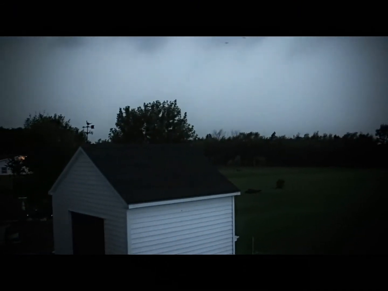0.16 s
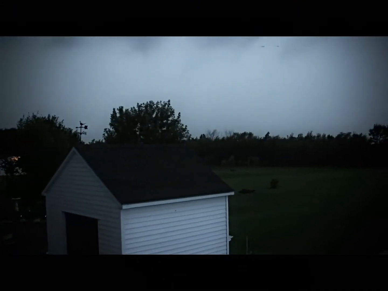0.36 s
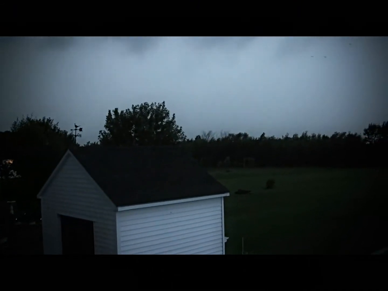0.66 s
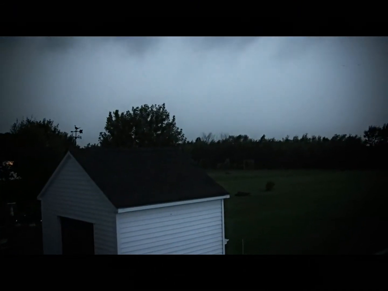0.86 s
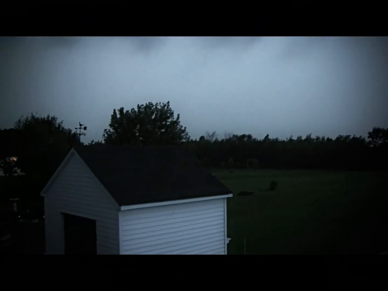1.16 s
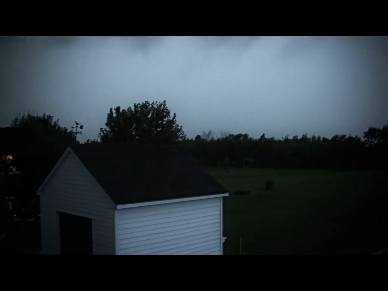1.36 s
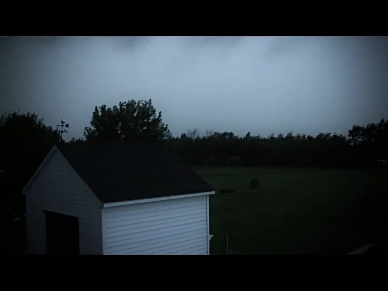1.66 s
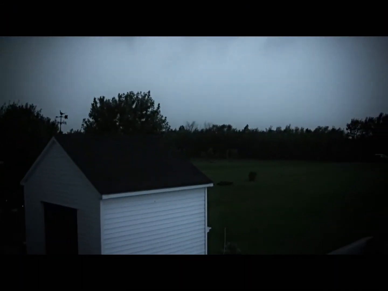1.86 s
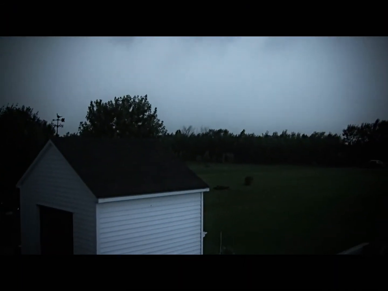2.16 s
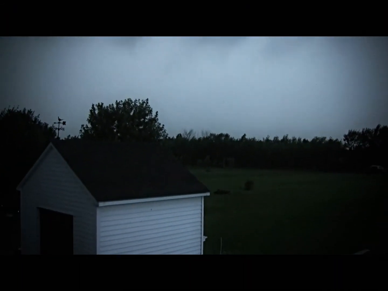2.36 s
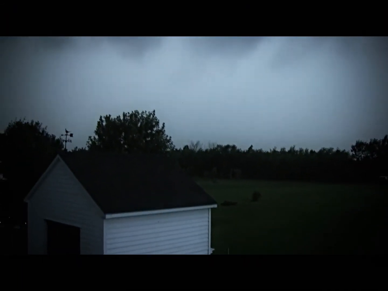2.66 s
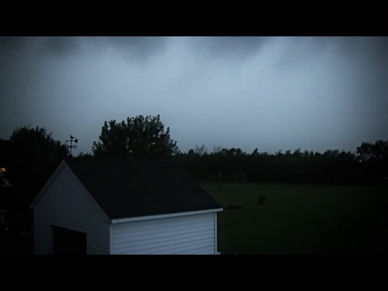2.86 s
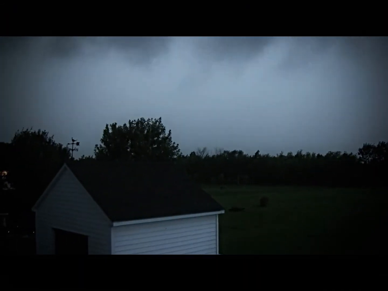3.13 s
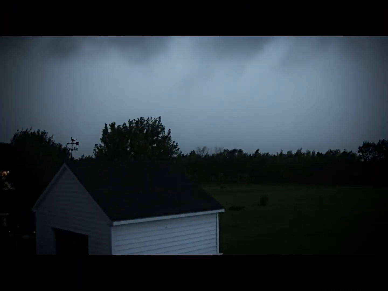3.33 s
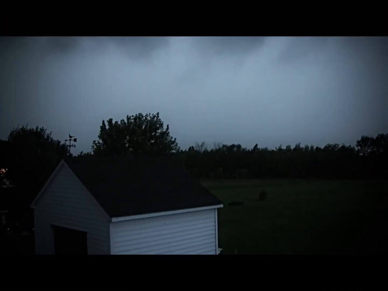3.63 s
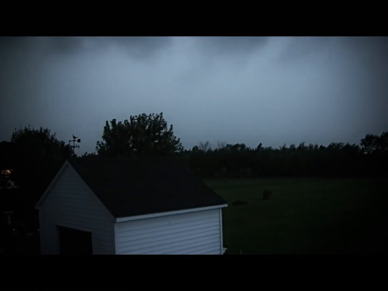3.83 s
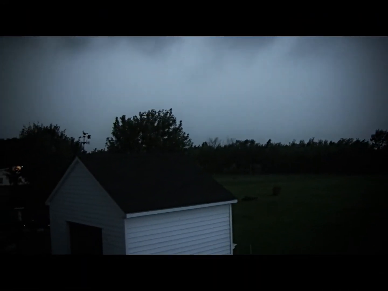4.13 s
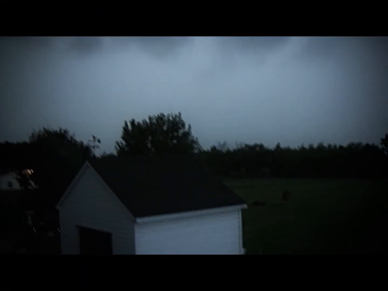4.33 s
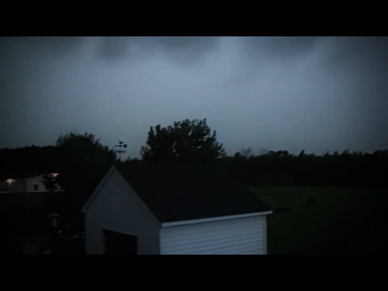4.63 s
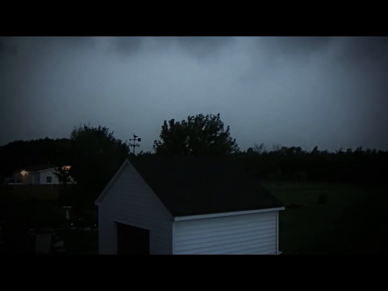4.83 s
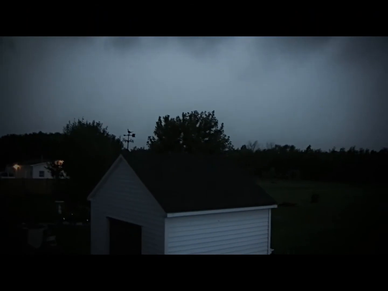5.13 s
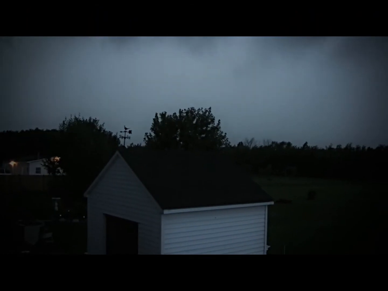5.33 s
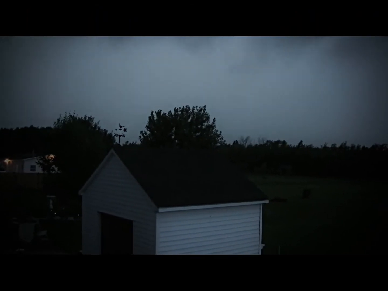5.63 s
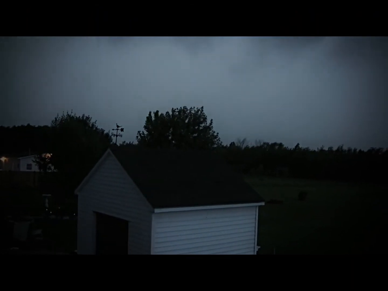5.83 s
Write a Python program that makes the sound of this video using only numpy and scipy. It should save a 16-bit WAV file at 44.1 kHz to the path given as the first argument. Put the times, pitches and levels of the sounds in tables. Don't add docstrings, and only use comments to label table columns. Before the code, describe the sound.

Thunder over a dark grassy yard: a third of a second of low haze, then a sudden heavy boom, sharp window-like snaps and rattling, and a second big boom around one and a half seconds. Further thuds merge into a long bass rumble that pulses and fades without fully stopping. Rain is only a faint far hiss. The stereo image is narrow in the bass, slightly boomy, with muffled highs and peaks held at full level.

```python
import sys
import numpy as np
from scipy import signal
from scipy.fft import rfft, irfft, next_fast_len
from scipy.io import wavfile
from scipy.ndimage import uniform_filter1d, minimum_filter1d

SR = 44100
rng = np.random.default_rng(int(sys.argv[2]) if len(sys.argv) > 2 else 0)


def log_audio(samples):
    frames = np.atleast_2d(samples).T
    limited = np.clip(frames, -1, 1)
    pcm = np.round(limited * 32767).astype(np.int16)
    wavfile.write(sys.argv[1], SR, pcm)


def field_ratio(decibels):
    return 10 ** (np.asarray(decibels, dtype=float) / 20)


N = 264319

# [t/s, level/dB, tilt towards short shocks/(dB per octave),
# clarity/(factor on the sharp fronts the air leaves)]
ROLL = [(0.0, -35.5, -1, 1.9), (0.308, -32, -0.6, 2.2), (0.328, -14, -3.5, 0.99), (0.58, -9.5, -2.85, 1.06),
        (1.129, -36, 11.5, 1.53), (1.249, -22.5, 3, 1.3), (1.575, -22, -3, 2.35), (1.605, -11.5, -1.3, 1.2),
        (2.05, -23.5, 1.5, 1.22), (2.09, -16.5, -4, 1.05), (2.47, -17.5, -0.7, 1.12),
        (2.78, -22.5, -1.0, 1.05), (3.0, -18, -4, 0.99), (3.39, -26.5, 1.1, 0.87), (4.17, -30, -1.7, 1.66),
        (4.31, -24.5, -3.5, 0.98), (5.2, -27, -3.5, 1.23), (5.99, -27, -2.2, 0.52)]
SHOCK_EDGES = [110, 190, 370]
# [f/Hz, share of the roll level/dB, build-up through echoes t/s]
SHOCK_LENGTHS = [(80.6, -10.5, .005), (145, -14, 0.0078), (265, -0.23, 0.0088), (473, -2.5, 0.013)]
# [t/s, peak level/dB, pitch f/Hz, t60/s]
SURGES = [(0.378, -11, 187, 0.81), (0.582, -2, 111, 0.11), (0.63, -11.3, 131, 1.3),
          (0.663, -11.5, 204, 1.68), (0.781, -9.5, 129, 0.91), (0.956, -12, 183, 0.28),
          (1.136, -20.5, 65.4, 1.14), (1.775, -14.5, 393, 0.3), (1.954, -26, 158, 0.26),
          (2.079, -12, 330, 1), (2.67, -11.5, 290, 0.16), (2.91, -9.5, 154, 0.13),
          (2.967, -11.5, 132, 0.28), (3.138, -18, 142, 1.61), (3.36, -14.5, 65, 0.12),
          (3.499, -19, 211, 1.9), (3.613, -22.5, 121, 1.4), (3.884, -18, 147, 0.25),
          (3.956, -17, 159, 0.24), (4.093, -11, 124, 0.1), (4.166, -20, 111, 0.16),
          (4.334, -21.5, 142, 1.3), (4.67, -18.5, 231, 0.66), (4.749, -19, 140, 1.5),
          (5.221, -14, 122, 0.25), (5.234, -19.5, 251, 0.28), (5.348, -17.5, 276, 0.16),
          (5.375, -23.5, 136, 2.04), (5.564, -11.5, 189, 0.21), (5.748, -14.5, 108, 0.14)]
SURGE_RISE_S, SURGE_NARROW_DB = 0.0043, 23.5
# [f/Hz, level/(dB per Hz)]
THUNDER_SPECTRUM = [(15, -51), (25, -44.5), (58, -16.5), (113, 0), (146, 6.5), (184, -1), (243, -2),
                    (300, -3.5), (421, -8), (604, -14), (831, -21), (1100, -29), (1540, -37.5),
                    (2850, -59.5), (4000, -91.5), (5200, -66.5), (8800, -120)]
# [f/Hz, width/Hz, level/dB]
ROOM_BOOM = [(87, 22, 1.5), (155, 6.9, 4.5), (200, 25, 2), (247.3, 28, 3.5), (338, 2.3, 3.5)]
# [f/Hz, side minus mid level/dB]
THUNDER_SIDE = [(60, -35.5), (150, -25.5), (380, -18), (950, -13), (2380, -8.5), (5980, 0), (15000, -7.5)]
# [f/Hz, left minus right level/dB]
THUNDER_LEAN = [(60, 0.5), (150, -0.5), (380, -3), (950, -1.5), (2380, -1.0), (5980, -8.5), (15000, 1)]
# [f/Hz, level/(dB per Hz)]
HAZE_SPECTRUM = [(15, -48), (25, -36), (64, -27), (119, -2.5), (160, -5.5), (240, -1.5), (684, -19.5),
                 (997, -25), (1900, -31), (13900, -52.5), (15500, -62)]
HAZE_DB = -32.5
# [f/Hz, side minus mid level/dB]
HAZE_SIDE = [(60, -24.5), (130, -10.5), (290, -12), (640, -11), (1410, -9), (3100, -5), (6820, -4),
             (15000, -6)]
# [t/s, level/dB]
SHOWER = [(0.0, -67), (1.749, -66.5), (2.3, -65), (3.1, -65.3), (3.4, -65.5), (5.99, -66)]
# [t/s, rise/s, t60/s, f/Hz,
# level/dB]
RINGS = [(0.317, .006, 0.37, 200, -18), (.385, 0.014, 0.54, 121.3, -4.5), (0.386, .015, 0.67, 253.2, -8.5),
         (.78, 0.033, 0.5, 155, -24), (1.232, 0.0034, 0.062, 740, -9), (1.231, 0.0021, 0.054, 1240, -15.5),
         (1.265, 0.0072, 0.26, 256.8, -12), (1.3646, .002, .07, 1400, -22), (1.589, 0.018, 0.93, 200, -3.5),
         (1.645, .008, .35, 265, -8.5), (1.67, 0.0089, 0.44, 466, -19.5), (1.782, 0.023, 0.56, 240, -16),
         (2.092, 0.04, 0.77, 239.8, -12.5), (2.602, 0.075, .7, 251, -23), (2.92, 0.022, 0.54, 176.5, -6.5),
         (3.878, 0.027, 0.83, 147.9, -12.5), (4.085, 0.014, .35, 77.7, -25), (4.42, 0.015, 0.26, 179, -9.5),
         (4.772, 0.043, 0.73, 141.8, -27), (4.886, .012, .3, 145, -23), (0.3552, .002, 0.045, 1493, -22)]
# [t/s, length/s, f/Hz, level/dB, unsteadiness/(share of f)]
CHIRPS = [
    (.333, 0.072, 4480, -58, .04),
    (0.953, 0.076, 4420, -63, .04),
    (2.07, 0.083, 5050, -55, 0.033),
    (2.09, 0.036, 8050, -64, .04),
    (2.18, 0.045, 7400, -74, .04),
    (4.0, .12, 4500, -67, .04),
    (4.684, 0.12, 1285, -45, 0.3),
    (4.838, 0.12, 1260, -45, 0.4),
    (5.0, .15, 4480, -65, 0.049),
]
# [t/s, peak level/dB, ring t60/s, rattle level/dB, brightness/(octaves above 1 kHz)]
SNAPS = [
    (0.3547, -17, 0.059, -7, 0.3),
    (.637, -28, 0.11, 4, 2.0),
    (1.2252, -30, 0.03, -10, 4.6),
    (1.2298, -9.5, 0.087, -2, 2.48),
    (1.238, -12.5, 0.03, -16, 0.033),
    (1.352, -32, 0.024, 10, 2.1),
    (1.3654, -11, 0.03, 2.5, 1.3),
    (1.3803, -16, 0.074, -2.5, 2.35),
    (1.748, -38, 0.032, 9, 1.8),
    (1.759, -31.5, 0.087, 0, 2.6),
]
SNAP_NARROW_DB = 0.9
SNAP_REACH = 2.18
# [f/Hz, width/Hz, level/dB]
FRAME_MODES = [(740, 150, 3.5), (1120, 230, 5), (1620, 260, 0), (1940, 190, -1), (2220, 200, 4),
               (3470, 260, -8.5), (4230, 410, -10.5), (5400, 1200, -15), (6700, 1100, -15)]
# [f/Hz, level/(dB per Hz)]
RATTLE_SPECTRUM = [(530, -42), (900, -6), (1140, 4), (1760, -5.5), (2130, -11.5), (2860, -14.5),
                   (3550, -16), (6000, -16), (15600, -42)]


def evened(x):
    return x / np.sqrt(np.mean(x ** 2) + 1e-20)


def read(points, hz):
    f, value = np.transpose(points)
    return np.interp(np.log(hz + 1), np.log(f + 1), value)


def add(mix, s, sound):
    part = mix[round(s * SR):][:len(sound)]
    part += sound[:len(part)]


def colour(x, gain):
    size = 2 * (gain.shape[-1] - 1)
    return irfft(rfft(x, size) * gain, size)[..., :x.shape[-1]]


def modes(table, hz):
    return np.sqrt(sum(field_ratio(2 * db) / (1 + (2 * (hz - f) / max(width, 5)) ** 2) for f, width, db in table))


def shocks(count):
    size = field_ratio(2.37 * np.minimum(rng.exponential(1, (2, count)), 4))
    size *= rng.choice([-1., 1.], (2, count))
    size *= rng.random((2, count)) < 2600 / SR
    path = rng.integers(0, 24, (2, count))
    lag = np.arange(SR // 12) / SR
    echoes = rng.standard_normal((24, 1, len(lag))) * field_ratio(-60 * lag / 0.068)
    smeared = sum(signal.oaconvolve(size * (path == k), echo, axes=1)[:, :count]
                  for k, echo in enumerate(echoes))
    return size + field_ratio(-19.5) * smeared


def roll(fine):
    t = fine[::32]
    s, level_db, tilt_db, clarity = np.transpose(ROLL)
    hz, share_db, build_s = np.transpose(SHOCK_LENGTHS)[:, :, None]
    tilted_db = np.interp(t, s, tilt_db) * np.log2(hz / 200)
    power = field_ratio(2 * (np.interp(t, s, level_db) + share_db + tilted_db))
    for start, db, pitch_hz, t60 in SURGES:
        age = np.maximum(t - start, 0)
        shape = field_ratio(-60 * age / max(t60, .05)) * (1 - np.exp(-age / SURGE_RISE_S))
        power = power + (field_ratio(db - SURGE_NARROW_DB * np.log2(hz / pitch_hz) ** 2) * shape) ** 2
    keep = np.exp(-1 / (np.maximum(build_s[:, 0], .001) * SR / 32))
    power = np.array([signal.lfilter([1 - k], [1, -k], p, zi=[k * p[0]])[0] for k, p in zip(keep, power)])
    levels = [np.interp(fine, t, level) for level in np.sqrt(power)]
    return levels, np.interp(fine, s, clarity)


def thunder():
    count = 2 * next_fast_len(N // 2 + SR // 10)
    hz, t = np.fft.rfftfreq(count, 1 / SR), np.arange(count) / SR
    boomy = np.hypot(1, modes(ROOM_BOOM, hz))
    front, flank = colour(shocks(count), field_ratio(read(THUNDER_SPECTRUM, hz)) * boomy)
    side = colour(flank, field_ratio(read(THUNDER_SIDE, hz)))
    lean = field_ratio(read(THUNDER_LEAN, hz) / 2 * np.array([[1], [-1]]))
    pair = colour(np.array([front + side, front - side]), lean)
    levels, clarity = roll(t)
    sharp_fronts = colour(pair, 1 - 1 / (1 + (hz / 1000) ** 3))
    pair = pair + (clarity ** 2 - 1) * sharp_fronts
    below = [1 / (1 + (hz / edge_hz) ** 8) for edge_hz in SHOCK_EDGES]
    shares = np.diff([0 * hz, *below, 1 + 0 * hz], axis=0)
    out = 0
    for share, level in zip(shares, levels):
        part = colour(pair, share)
        steady = np.sqrt(abs(uniform_filter1d((part ** 2).mean(0), 3000)) + 1e-20)
        out = out + level * part / steady
    return out[:, :N]


def haze():
    frames, hz = N // 256 + 5, np.fft.rfftfreq(1024, 1 / SR)
    a, b, c, d, patches = rng.standard_normal((frames, 513, 5)).T
    patches = evened(uniform_filter1d(uniform_filter1d(patches, 30, 0), 10, 1))
    gusts = evened(uniform_filter1d(rng.standard_normal(frames), 16))
    mid = a + 1j * b
    side = field_ratio(read(HAZE_SIDE, hz))[:, None] * (c + 1j * d)
    spectra = np.array([mid + side, mid - side])
    rain_db = np.interp((np.arange(frames) - 2) * 256 / SR, *np.transpose(SHOWER))
    rainy = np.clip(hz / 7000, 0, 1)[:, None]
    steady_db = read(HAZE_SPECTRUM, np.minimum(hz, 14300))[:, None]
    flicker_db = 0.34 * patches + (-0.12 + 1.0 * rainy) * gusts
    spectra *= field_ratio(steady_db + flicker_db + rainy * (rain_db - rain_db.mean()))
    sound = signal.istft(spectra, nperseg=1024, noverlap=768)[1][:, :N]
    return field_ratio(HAZE_DB) * evened(sound)


def rings():
    t, out = np.arange(SR // 2) / SR, np.zeros(N)
    fade = np.hanning(SR)[SR // 2:]
    for (s, rise, t60, hz, db), (start, split) in zip(RINGS, rng.random((len(RINGS), 2))):
        tone = np.sin(2 * np.pi * (hz * t + start))
        partner = 0.84 * np.sin(2 * np.pi * (hz * (1.03 + 0.05 * split) * t + start))
        swell = field_ratio(db - 60 * t / t60) * (1 - np.exp(-t / rise)) ** 2
        add(out, s, swell * (tone + partner) * fade)
    return out * field_ratio(np.array([[-.8], [.8]]))


def insects():
    out = np.zeros(N)
    for s, length, hz, db, unsteady in CHIRPS:
        waver = uniform_filter1d(rng.standard_normal(SR // 2), 150)[:round(length * SR)]
        tone = np.sin(2 * np.pi * np.cumsum(hz * (1 + unsteady * waver)) / SR)
        add(out, s, field_ratio(db) * tone * signal.windows.tukey(len(tone), .6))
    return out


def window():
    t, out = np.arange(8192) / SR, np.zeros((2, N))
    hz = np.fft.rfftfreq(len(t), 1 / SR)
    left_right = np.array([[1], [-1]])
    for s, db, ring_t60, rattle_db, octaves in SNAPS:
        scrape, shake, side = rng.standard_normal((3, len(t)))
        slope = field_ratio(-SNAP_NARROW_DB * (np.log2((hz + 200) / 1000) - octaves) ** 2)
        slope = slope / (1 + (hz / (SNAP_REACH * 1000 * 2 ** octaves)) ** 6)
        ring = colour(scrape + .18 * side * left_right, modes(FRAME_MODES, hz) * slope)
        ring = ring * field_ratio(-60 * t / ring_t60) * np.minimum(t / 0.0011, 1)
        loose = colour(shake + 0.7 * side * left_right, field_ratio(read(RATTLE_SPECTRUM, hz)) * slope)
        rattle = evened(loose) * field_ratio(rattle_db - 15 - 60 * t / 0.16) * np.minimum(t / 0.007, 1)
        for channel, part in zip(out, ring / abs(ring).max() + rattle):
            add(channel, s, field_ratio(db) * part)
    return out


def scene():
    return thunder() + haze() + rings() + insects() + window()


def low_pass(x):
    return signal.sosfilt(signal.butter(12, 15740, fs=SR, output="sos"), x)


def record(dry):
    peak = np.maximum(-minimum_filter1d(-abs(dry).max(0), size=301), 1)
    held = dry / uniform_filter1d(uniform_filter1d(peak, size=151), size=151)
    return low_pass(held)


dry = scene()
out = record(dry)
log_audio(out)
```